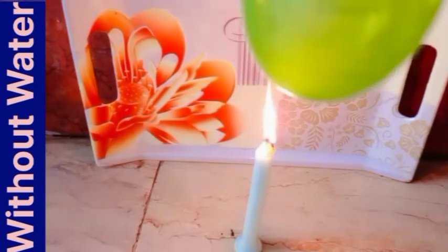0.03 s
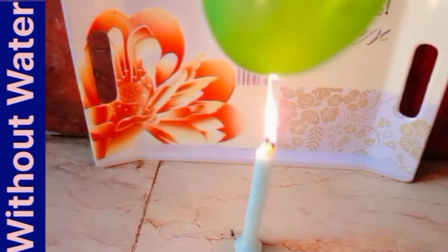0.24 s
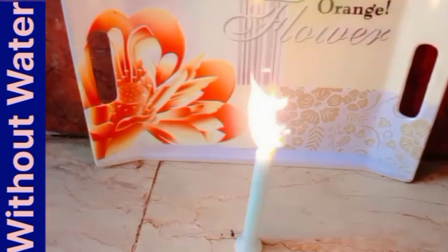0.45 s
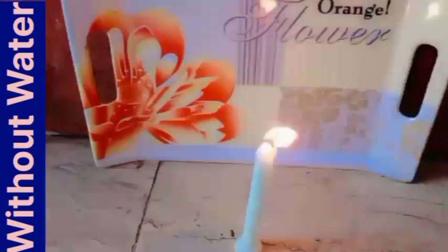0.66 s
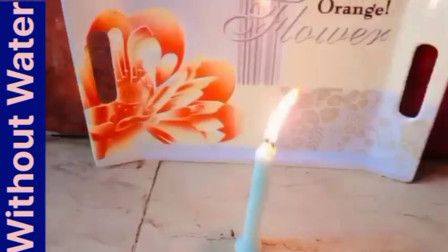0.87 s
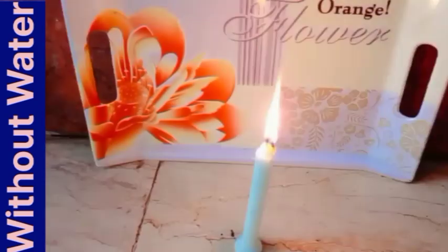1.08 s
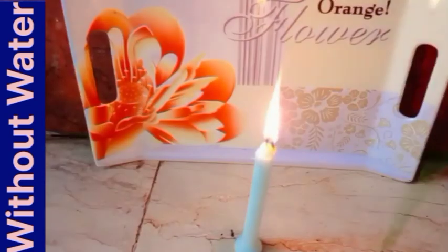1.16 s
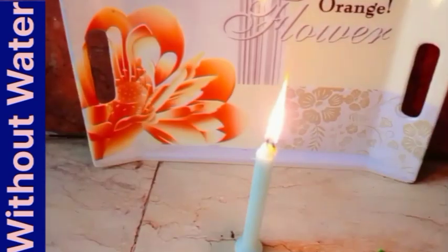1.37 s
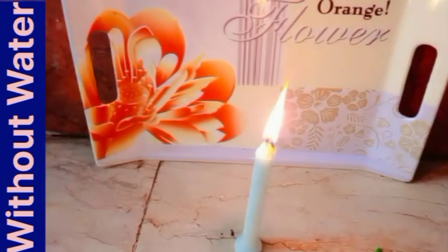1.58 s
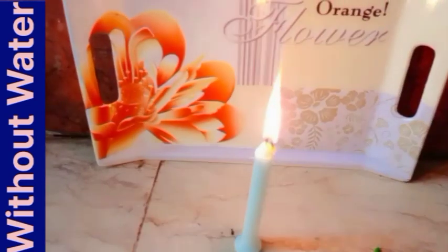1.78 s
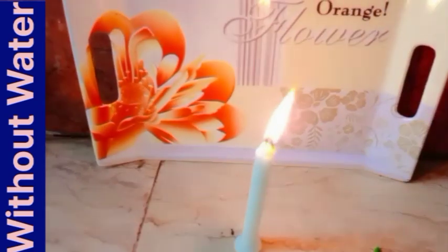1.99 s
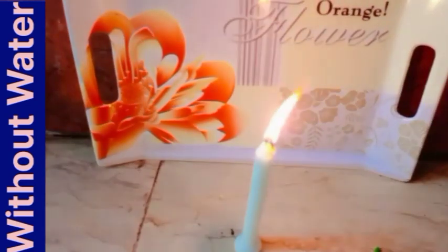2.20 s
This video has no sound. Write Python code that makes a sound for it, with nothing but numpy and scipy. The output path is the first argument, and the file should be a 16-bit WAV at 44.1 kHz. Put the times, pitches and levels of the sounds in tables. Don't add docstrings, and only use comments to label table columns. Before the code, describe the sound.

Low fan hum and faint flame flutter, then a violent balloon bang with a snappy rubber crack; dense reverberation decays over about a second, the phone squashes the level, and dull room noise slowly returns.

```python
import sys
import numpy as np
from scipy import signal
from scipy.io import wavfile
from scipy.ndimage import uniform_filter1d

SR = 44100
rng = np.random.default_rng(int(sys.argv[2]) if len(sys.argv) > 2 else 0)


def store_pcm(level_fs):
    pcm = np.round(np.clip(level_fs, -1, 1) * 32767).astype(np.int16)
    wavfile.write(sys.argv[1], SR, np.atleast_2d(pcm).T)


def convert_level_to_amplitude(level_db):
    exponent = np.asarray(level_db, float) / 20
    return 10 ** exponent


N = 99225
BURST_S = 0.529

# f/Hz, level per Hz/dB
AIR_COLOUR = [(18, -24), (40, -2.5), (150, -4), (300, -8.5), (600, -20), (2200, -27), (8000, -51),
              (14000, -60.5)]
# f/Hz, width/Hz, level/dB
FAN_HUMS = [(116, 36, -43.5), (235.7, 50, -37.5), (401, 45, -43.5), (855, 200, -50), (12900, 4600, -74.5)]
# f/Hz, level/dB
BLADE_TONE = [(409.1, -45)]
# f/Hz, width/Hz, level/dB
SLEEVE = [(4200, 2000, -60.5), (13000, 5000, -70)]
# f/Hz, level/dB
TRAY_RING = [(538.3, -50)]
# f/Hz, width/Hz, level/dB
FLAME_BANDS = [(60, 20, -41), (900, 490, -52), (2140, 170, -57), (3860, 1800, -61.5)]
# t/s, level/dB, f/Hz, length/s, band ratio/1
SCRAP_TICKS = [
    (.421, -52, 6200, .012, 1.25),
    (1.2745, -54, 12000, .003, 1.3),
    (1.307, -46.5, 11260, 0.0083, 2.5),
    (2.0457, -52.5, 7000, .003, 1.7),
    (2.162, -58, 12500, .003, 1.2),
]
# f/Hz, level per Hz/dB
TAIL_COLOUR = [(70, -19), (200, -7.5), (750, -4.5), (2000, -9), (5000, -14), (8800, -27.5), (13500, -19),
               (16000, -23.5)]
# f/Hz, T60/s
ROOM_DECAY = [(100, 1), (300, 0.84), (1000, 0.74), (4000, 0.71), (8000, 0.66), (14000, 0.43)]
# delay/s, lift/dB, width/s
WALL_CLUSTERS = [(0.028, 1, .008), (0.056, 1, 0.0067), (0.071, 2, .006), (0.111, 0.5, 0.021),
                 (.15, -1, .012), (.185, -0.5, 0.0081)]
# f/Hz, level/dB, T60/s, rise/s
ROOM_MODES = [(105.2, -7.5, 0.81, 0.026), (150.3, -11.5, 0.96, 0.036), (216.4, -7, 0.78, .03),
              (284.6, -12.5, .7, 0.016), (392, -10, .8, 0.012), (637, -21, 0.44, .03),
              (721, -5.5, 0.66, 0.026), (743, -17, 0.36, 0.033), (866, -7, 0.44, 0.024),
              (973, -21.5, 1.3, 0.18), (1034, -11.5, 0.26, 0.022), (1142, -18.5, 0.85, 0.019)]
# delay/s, level/dB, sign/1
NEAR_BOUNCES = [(.00038, -8, -1), (.0008, -9, 1), (.00125, -2, -1), (.0016, -5, -1), (.0033, -5, 1),
                (.0047, -7, 1), (.0053, -7, -1), (.006, -6, 1), (.0072, -6, -1)]


def evened(x):
    return x / np.sqrt(np.mean(x ** 2) + 1e-20)


def read(points, hz):
    f, value = np.transpose(points)
    return np.interp(np.log(hz + 1), np.log(f + 1), value)


def add(mix, start_s, sound):
    part = mix[round(start_s * SR):][:len(sound)]
    part += sound[:len(part)]


def patchy(shape, bins, frames):
    smooth = uniform_filter1d(rng.standard_normal(shape), size=bins, axis=0)
    return evened(uniform_filter1d(smooth, size=frames, axis=1))


def resonate(x, hz, width_hz):
    turn = np.exp(2j * np.pi * hz * np.arange(len(x)) / SR)
    r = np.exp(-np.pi * width_hz / SR)
    return 2 * (turn * signal.lfilter([1 - r], [1, -r], x / turn)).real


def fuzzy(table):
    total = np.zeros(N)
    for hz, width_hz, db in table:
        once = resonate(rng.standard_normal(N), hz, width_hz)
        total += convert_level_to_amplitude(db) * evened(resonate(once, hz, width_hz))
    return total


def room_air():
    hz = np.fft.rfftfreq(2048, 1 / SR)
    shape = (len(hz), N // 512 + 5)
    noise = rng.standard_normal(shape) + 1j * rng.standard_normal(shape)
    level_db = read(AIR_COLOUR, hz)[:, None] + 1.1 * patchy(shape, 12, 6)
    air = signal.istft(noise * convert_level_to_amplitude(level_db), nperseg=2048, noverlap=1536)[1][:N]
    return convert_level_to_amplitude(-32) * evened(air)


def fan():
    t = np.arange(N) / SR
    hz, db = BLADE_TONE[0]
    level = convert_level_to_amplitude(db + 5) * np.clip((t - 1.69) / 0.3, 0.3, 1)
    return fuzzy(FAN_HUMS) + np.sqrt(2) * level * np.sin(2 * np.pi * hz * t)


def rustle():
    return fuzzy(SLEEVE) * np.clip((np.arange(N) / SR - 1.91) / 0.054, 0, 1)


def tray_ring():
    t = np.arange(N) / SR
    hz, db = TRAY_RING[0]
    late = t - 0.89
    rise = np.exp(-(np.minimum(late, 0) / 0.04) ** 2)
    fall = convert_level_to_amplitude(db + 17.5 - 60 * np.maximum(late, 0) / 1.1)
    return np.sqrt(2) * rise * fall * np.sin(2 * np.pi * hz * t)


def flame():
    return fuzzy(FLAME_BANDS) * np.clip((BURST_S - np.arange(N) / SR) / 0.01 + 1, 0, 1)


def tick(level_db, hz, length_s, ratio):
    t = np.arange(3000) / SR
    tail = convert_level_to_amplitude(-7) * np.exp(-(t - length_s) / 0.029)
    shape = np.where(t < length_s, np.minimum(t / 0.0005, 1), tail)
    edges_hz = np.clip([hz / ratio, hz * ratio], 100, SR / 2.2)
    band = signal.butter(2, edges_hz, "band", fs=SR, output="sos")
    return convert_level_to_amplitude(level_db) * shape * evened(signal.sosfilt(band, rng.standard_normal(3000)))


def gust():
    length_s, hz = 0.034, 54.3
    t = np.arange(0, length_s, 1 / SR)
    return convert_level_to_amplitude(-12) * np.sin(np.pi * t / length_s) * np.sin(2 * np.pi * hz * t)


def reflections():
    taps = rng.standard_normal(2 * SR) * convert_level_to_amplitude(0.27 * rng.exponential(1, 2 * SR))
    hz, frame_s, z = signal.stft(taps, SR, nperseg=512)
    level_db = read(TAIL_COLOUR, hz)[:, None] + 1.0 * patchy(z.shape, 8, 3)
    level_db = level_db - 60 * frame_s / read(ROOM_DECAY, hz)[:, None]
    tail = signal.istft(z * convert_level_to_amplitude(level_db), SR, nperseg=512)[1][:2 * SR]
    t = np.arange(2 * SR) / SR
    early = convert_level_to_amplitude(-6.5 - 60 * t / 0.4)
    tail = tail / np.sqrt(np.mean(tail[:2000] ** 2)) * (1 + early)
    lift_db = sum(db * np.exp(-((t - delay) / width) ** 2) for delay, db, width in WALL_CLUSTERS)
    return tail * convert_level_to_amplitude(lift_db)


def echoes():
    t = np.arange(2 * SR) / SR
    tail = reflections()
    for hz, db, t60, rise_s in ROOM_MODES:
        swell = convert_level_to_amplitude(db - 60 * t / t60) * (1 - np.exp(-(t / rise_s) ** 2))
        tail = tail + swell * np.sin(2 * np.pi * (hz * t + rng.random()))
    return convert_level_to_amplitude(-1) * tail * np.clip(t / 0.0023 - 0.5, 0, 1)


def rubber_crack(t):
    u = np.maximum(t - 0.0004, 0) / 0.003
    tear = evened(resonate(rng.standard_normal(len(t)), 14300, 2000))
    shreds = evened(resonate(rng.standard_normal(len(t)), 3300, 2500))
    return (convert_level_to_amplitude(5) * tear + convert_level_to_amplitude(-0.5) * shreds) * np.minimum(8 * u, 1) * np.exp(-u)


def pressure_step(t):
    step_s, level_db = 0.00011, 17
    out = np.zeros(len(t))
    for delay, db, sign in [(0, 0.012, 1)] + NEAR_BOUNCES:
        u = np.maximum(t - delay, 0) / step_s
        pulse = u ** 2 * (1 - 0.15 * u) * np.exp(2 - 1.1 * u) / 4
        out += sign * convert_level_to_amplitude(level_db + db) * pulse
    return out


def burst():
    t = np.arange(2000) / SR
    thump = np.sin(2 * np.pi * 330 * t + 1.4) * convert_level_to_amplitude(-6.5 - 60 * t / 0.02)
    return pressure_step(t) + rubber_crack(t) + thump


def scene():
    mix = room_air() + fan() + rustle() + tray_ring() + flame()
    for start_s, *settings in SCRAP_TICKS:
        add(mix, start_s, tick(*settings))
    add(mix, BURST_S + 0.0037, gust())
    add(mix, BURST_S, echoes())
    add(mix, BURST_S, burst())
    return mix[None]


def top_cut(x):
    return signal.sosfilt(signal.butter(12, 16970, fs=SR, output="sos"), x)


def record(dry):
    duck_db, settle_db = -13, -4
    since = np.arange(N) / SR - BURST_S
    back = np.clip((since - 1.183) / 0.48, 0, 1)  # wait, then return, s
    slow_db = duck_db * np.clip(since / 0.025, 0, 1)
    slow_db = slow_db + (settle_db - duck_db) * back ** 2 * (3 - 2 * back)
    x = dry * convert_level_to_amplitude(slow_db)

    ceiling_db, release_db_per_s, look_s = -9.3, 400, 0.004
    power_db = 10 * np.log10(abs(uniform_filter1d(x[0] ** 2, size=200)) + 1e-12)
    fall = np.arange(N) * release_db_per_s / SR
    held_db = np.maximum.accumulate(power_db + fall) - fall
    over_db = np.maximum(held_db - ceiling_db, 0)
    over_db = np.maximum(over_db, np.roll(over_db, -round(look_s * SR)))
    x = x / convert_level_to_amplitude(uniform_filter1d(over_db, size=120))

    x = 1.6 * np.tanh(x / 1.6)
    x = signal.sosfilt(signal.butter(2, 25, "high", fs=SR, output="sos"), x)
    top_edge = signal.firwin(301, 15800, window=("kaiser", 7), fs=SR)
    x = signal.oaconvolve(x, top_edge[None], "same")
    return top_cut(x)


dry = scene()
out = record(dry)
store_pcm(out)
```